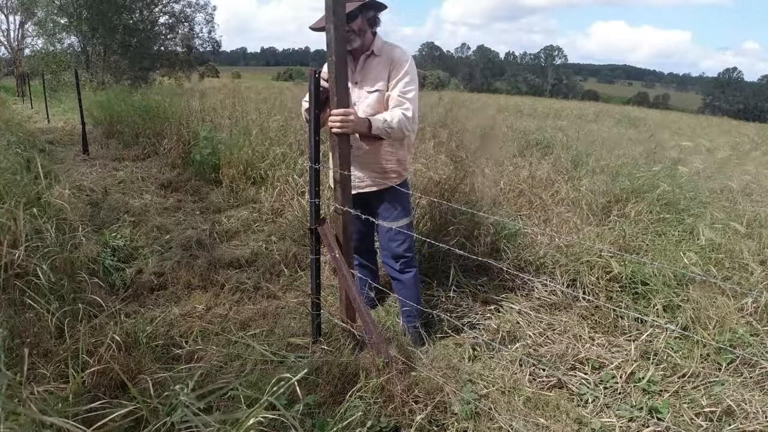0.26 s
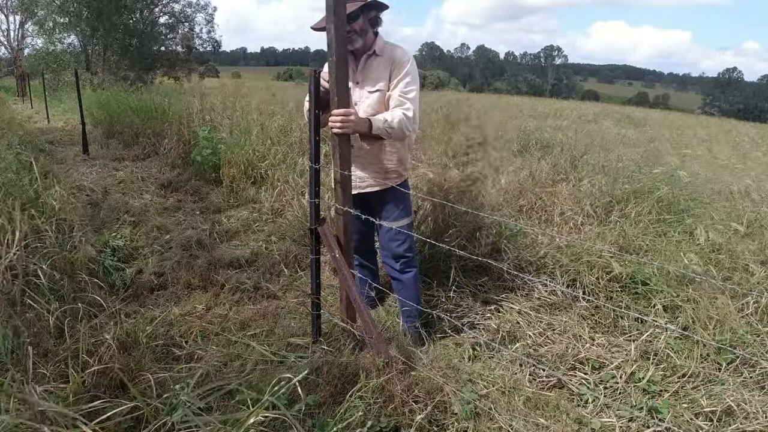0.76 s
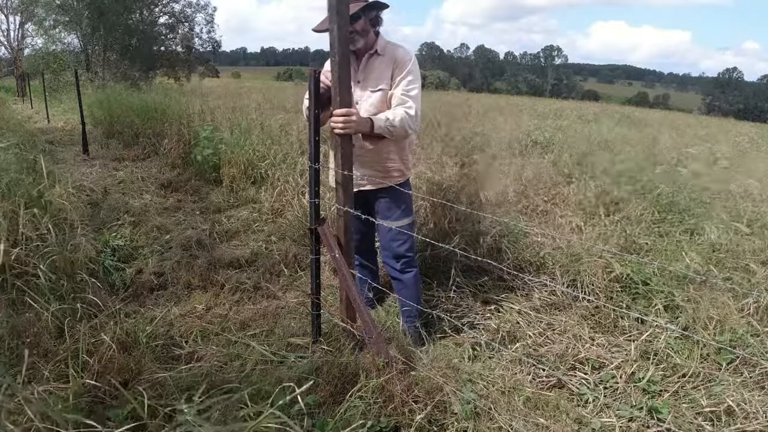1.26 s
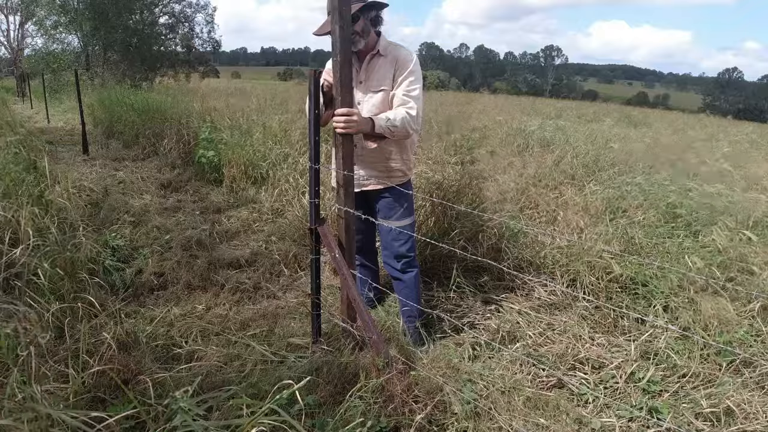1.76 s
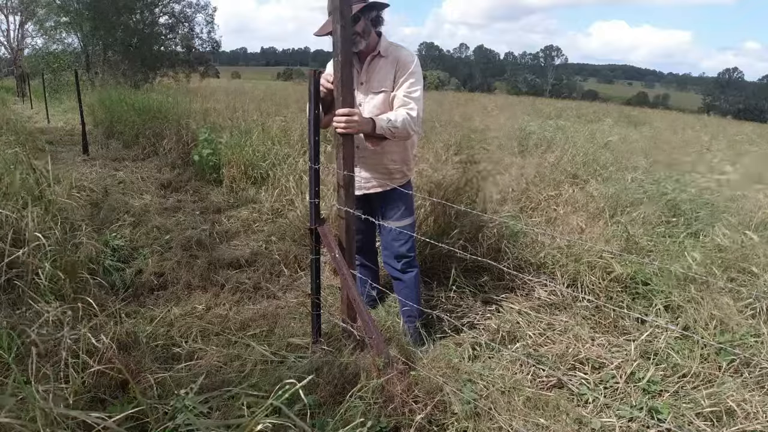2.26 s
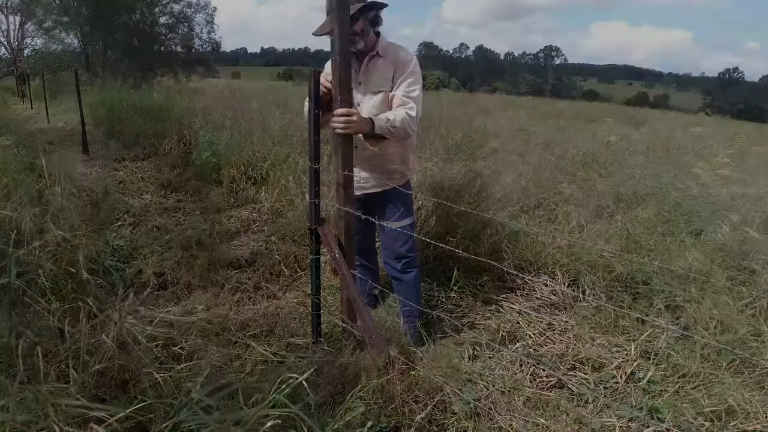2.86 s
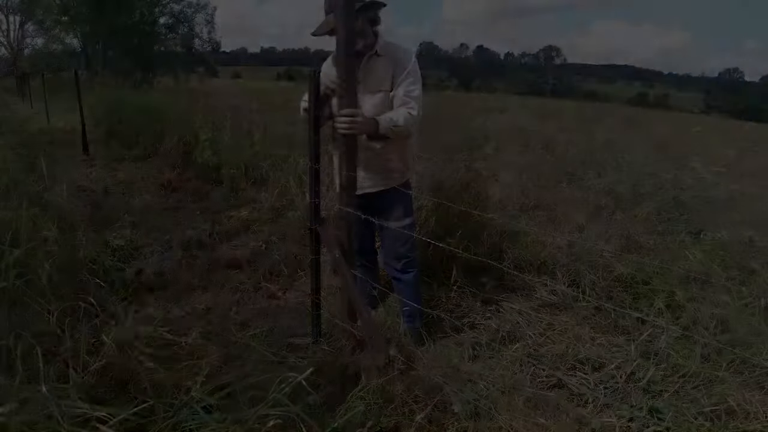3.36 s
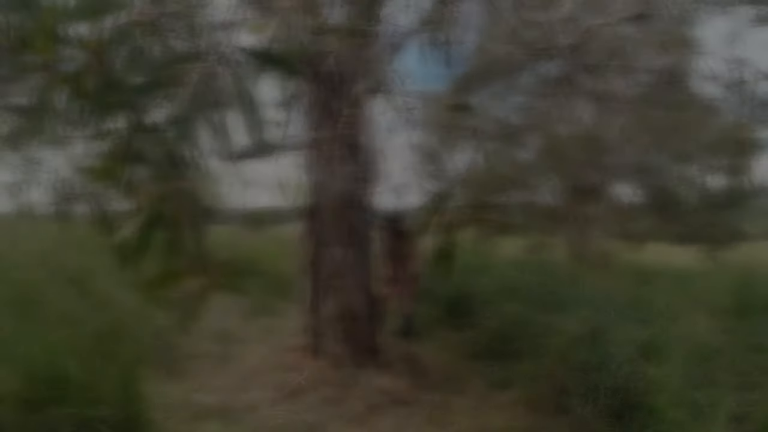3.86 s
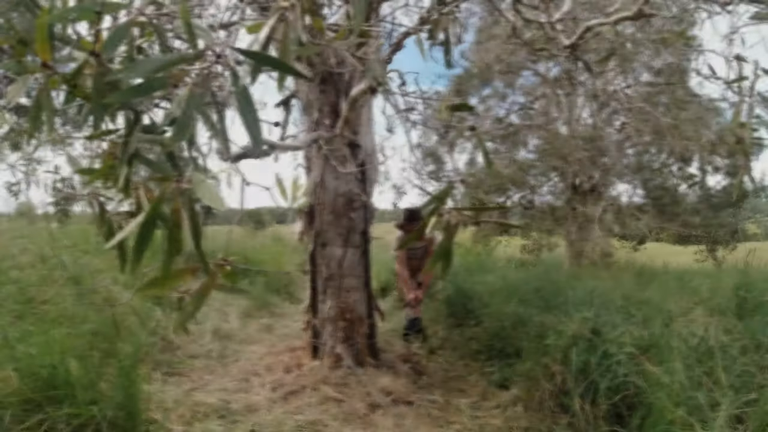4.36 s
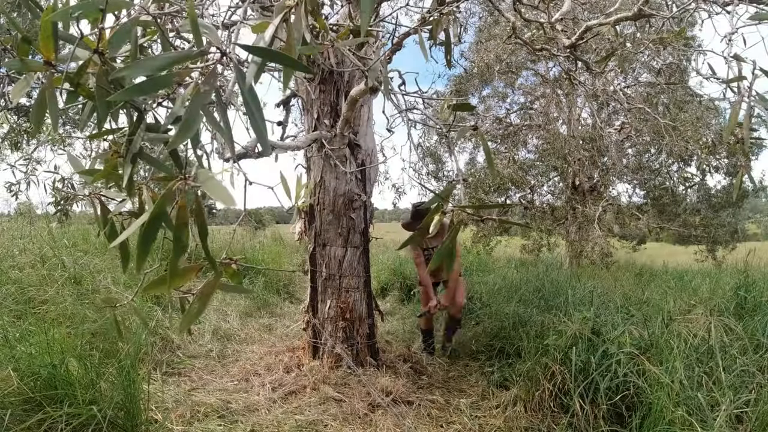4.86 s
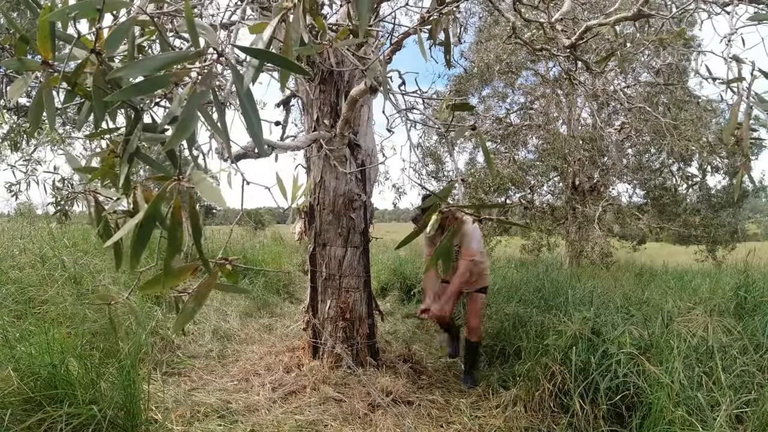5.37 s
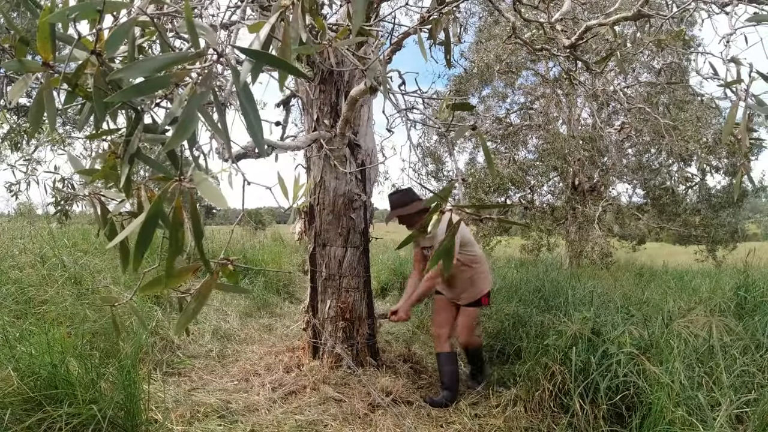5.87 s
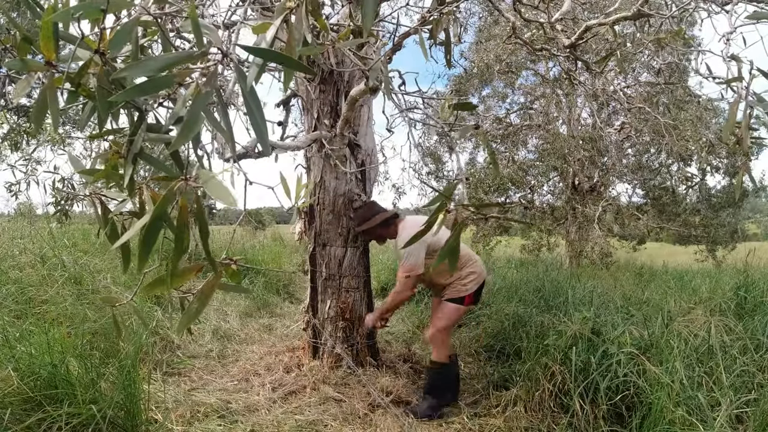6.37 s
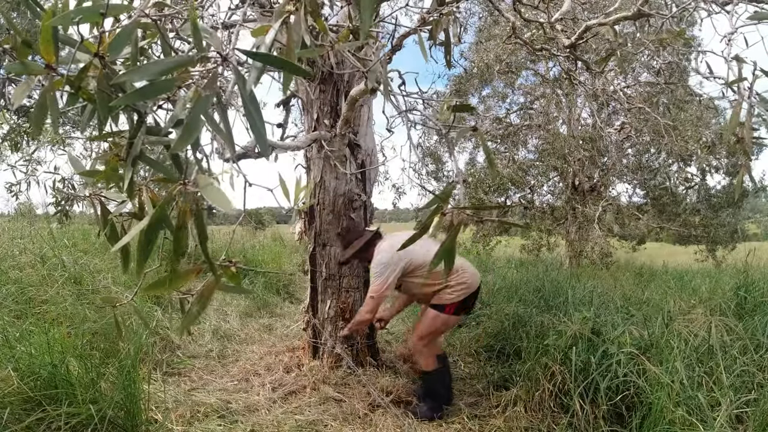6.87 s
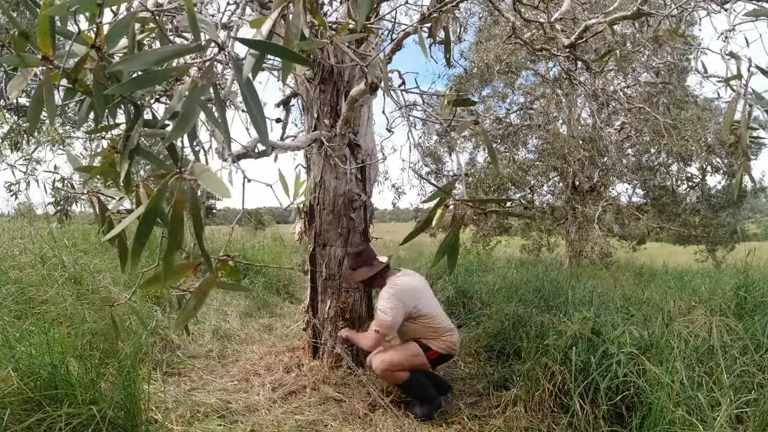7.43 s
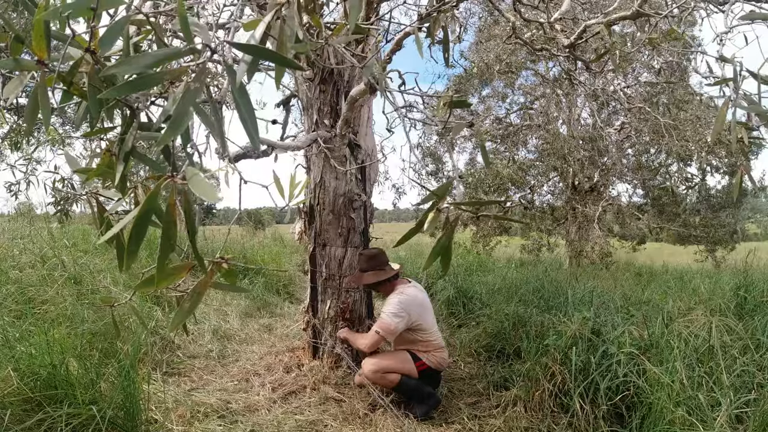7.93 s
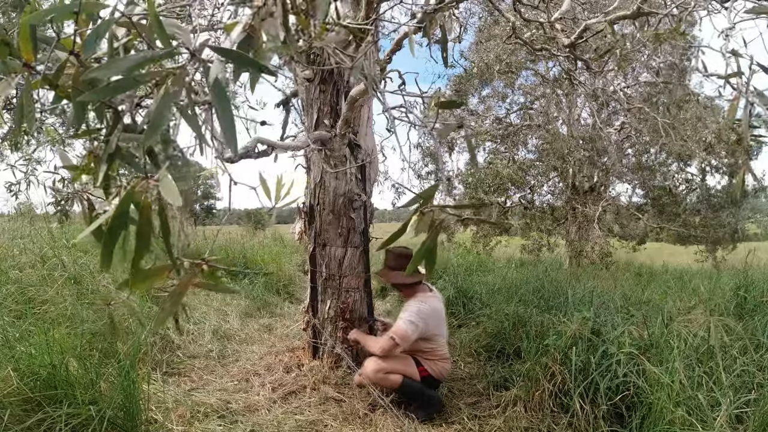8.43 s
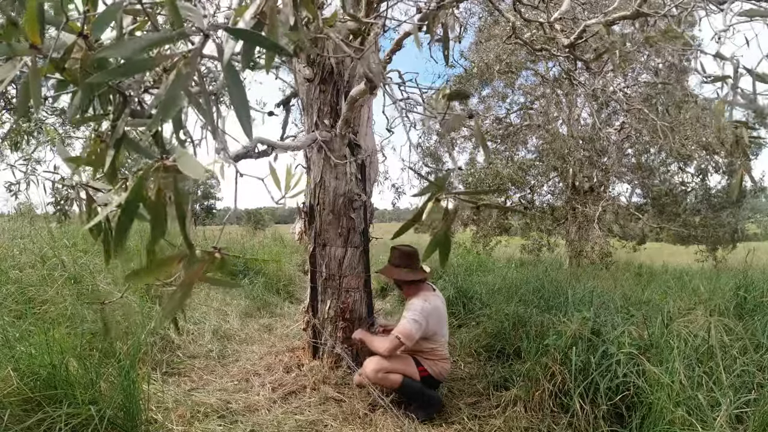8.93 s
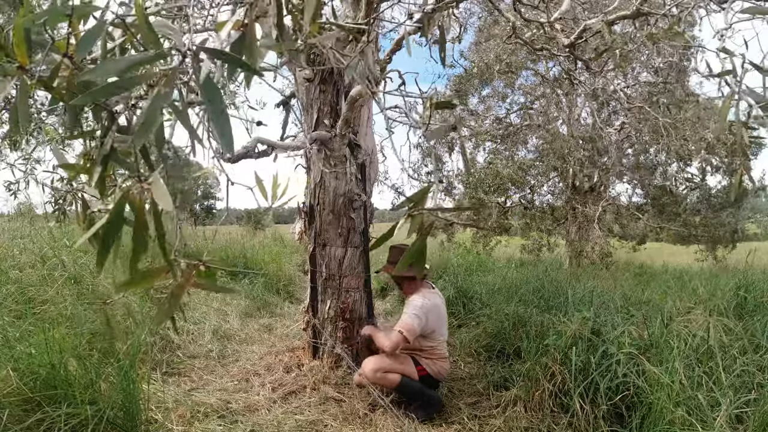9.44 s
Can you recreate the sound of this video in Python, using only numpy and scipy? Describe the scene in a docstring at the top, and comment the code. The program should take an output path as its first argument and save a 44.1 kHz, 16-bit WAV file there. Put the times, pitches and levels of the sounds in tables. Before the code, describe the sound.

From 0 s a short low gust bumps the microphone over a thin grassy breeze; from 0.9 to about 2.8 s heavier buffeting rumbles and distorts, with a faint tick near 2.1. It calms around 3 s, and faint chirps appear at 3.5. Near 4 s the air becomes a fuller hush under trees; boots swish through long grass, stalks snapping at 4.3-4.6, then a dense burst of cracks and thuds at 5.0-5.25. A distant engine drones about 4.2-6. Upward chirps recur; a stomp lands at 5.8, a faint steady whistling tone at 6-6.3, and a dull knock at 6.5. Rustling settles; a far bird trills evenly at 7.4-8.6, two clicks at 7.8. Wire jerks and rings at 8.35, rubs from 8.6, then from 9 to the end scrapes, rattles and squeaks rapidly with a thin high singing and soft wind rumble.

```python
"""Barbed wire is tugged, scraped and rattled round a trunk until it squeaks and rings: filtered friction noise,
decaying wire modes and short gliding tones; one long, faint, steady whistling tone is made like the squeaks.
Gusts first buffet the microphone as low-frequency noise; filtered noise also makes the breeze. Boots swish through
long grass (dense tiny fractures) and stomp, dry stalks snap and dull knocks land (short noise bursts).
Small birds call in gliding sines, and a far engine drones for a moment as a wavering sine."""
import sys
import numpy as np
from scipy import signal
from scipy.fft import rfft, irfft, next_fast_len
from scipy.io import wavfile
from scipy.ndimage import uniform_filter1d, map_coordinates

SR = 44100
rng = np.random.default_rng(int(sys.argv[2]) if len(sys.argv) > 2 else 0)


def store_wav(level_fs):
    """Save 16-bit WAV to argv[1]."""
    pcm = np.round(np.clip(np.atleast_2d(level_fs), -1, 1) * 32767)
    wavfile.write(sys.argv[1], SR, pcm.T.astype(np.int16))


N = 427769

TOP_HZ = 15750  # band limit of the microphone, and highest pitch of a grass fracture
# Spectrum of snaps, stomps and of wire rubbing on bark.
# Each row: frequency in Hz, relative spectral level in dB.
SNAP_SPECTRUM = [(100, -6.5), (500, 7), (1200, 7.5), (2200, 2.5), (3700, 3), (5300, -9), (8500, -9),
                 (12000, -21), (15500, -24)]


def amp(db):
    """Decibel law: 20 dB is a factor of ten in amplitude."""
    return 10 ** (np.asarray(db) / 20)


def unit(x):
    """Power normalisation: scale to rms 1."""
    return x / np.sqrt(np.mean(x ** 2) + 1e-20)


def along(points, hz):
    """Log-frequency interpolation: read (Hz, value) points at the frequencies hz."""
    f, v = np.transpose(points)
    return np.interp(np.log(hz + 1), np.log(f + 1), v)


def curves(rows):
    """Linear interpolation in time: one value per sample for each column after the time."""
    s, *columns = np.transpose(rows)
    return [np.interp(np.arange(N) / SR, s, column) for column in columns]


def during(rows, fade):
    """Linear gating: 1 while a curve lasts, fading to 0 outside it over fade seconds."""
    start, end = rows[0][0], rows[-1][0]
    return np.interp(np.arange(N) / SR, [start - fade, start, end, end + fade], [0, 1, 1, 0])


def wobble(rate):
    """Slow random modulation: a smooth curve through rate random knots a second."""
    knots = rng.standard_normal(int(N * rate / SR) + 4)
    return map_coordinates(knots, [np.arange(N) * rate / SR])


def stroke(s, rise, length, t60):
    """Envelope of one movement: a smooth rise, a hold until length, then an exponential decay."""
    t = np.arange(N) / SR - s
    onset = np.sin(np.pi / 2 * np.clip(t / rise, 0, 1)) ** 2
    return onset * np.exp(-np.log(1000) * np.clip((t - length) / t60, 0, 10))


def add(track, s, sound):
    """Superposition: mix a sound into the track at time s."""
    part = track[max(round(s * SR), 0):][:len(sound)]
    part += sound[:len(part)]


def noise(spectrum):
    """Spectral shaping: Gaussian noise of rms 1 with this spectrum."""
    m = next_fast_len(N + SR)
    white = rfft(rng.standard_normal(m))
    return unit(irfft(white * amp(along(spectrum, np.fft.rfftfreq(m, 1 / SR))), m)[:N])


def coloured(x, spectrum):
    """Minimum-phase filtering: a folded cepstrum gives a causal filter with this spectrum."""
    size = 8192
    cepstrum = irfft(np.log(amp(along(spectrum, np.fft.rfftfreq(size, 1 / SR)))))
    cepstrum[1:size // 2] *= 2
    cepstrum[size // 2 + 1:] = 0
    return signal.fftconvolve(x, irfft(np.exp(rfft(cepstrum))))[:len(x)]


def patchy(x, depth_db):
    """Time-varying spectrum: drifting patches of stronger and weaker sound, shallower in the bass, rms 1."""
    hz, _, z = signal.stft(x, SR, nperseg=1024)
    across_hz = uniform_filter1d(rng.standard_normal(z.shape), size=3, axis=0)
    field = unit(uniform_filter1d(across_hz, size=9, axis=1))
    depth = depth_db * (hz / (hz + 120))[:, None]
    return unit(signal.istft(z * amp(depth * np.clip(field, -2, 2)), nperseg=1024)[1][:N])


def crackle(spectrum, rate, spread_db, hiss):
    """Random fracture: many tiny damped ticks of varied size and pitch over a smooth rubbing hiss, rms 1."""
    t = np.arange(SR // 400) / SR
    when, pitch, size = rng.random((int(rate * N / SR), 3)).T[:, :, None]
    strength = amp(spread_db * np.minimum(-np.log(1 - size), 3))
    ticks = strength * np.sin(2 * np.pi * TOP_HZ * pitch * t) * np.exp(-t / .0007)
    at = (when * N).astype(int) + np.arange(len(t))
    grains = unit(np.bincount(at.ravel(), ticks.ravel(), N)[:N])
    return unit(coloured(grains + hiss * rng.standard_normal(N), spectrum))


def bounced(x, gain):
    """Early reflection: ground and trunk return a few copies within milliseconds."""
    out = x.copy()
    for delay in rng.uniform(.0008, .007, size=4):
        add(out, delay, gain * rng.choice([-1, 1]) * x)
    return out


def burst(spectrum, body_db, top_db, t60, attack, crack):
    """Impulsive friction: an optional first crack and a dying train of micro-slips, tilted in body and top."""
    t = np.arange(SR // 4) / SR
    slips = amp(3.5 * unit(uniform_filter1d(rng.standard_normal(len(t)), size=50)))
    force = rng.standard_normal(len(t)) * slips * amp(-60 * t / t60) * (1 - np.exp(-t / attack))
    force[0] += crack
    tilt = [(1200, body_db), (2400, 0.02), (4200, 0.0047), (8000, top_db), (14000, 2 * top_db - 2.5)]
    x = bounced(coloured(force, [(hz, db + along(tilt, hz)) for hz, db in spectrum]), gain=0.26)
    # bring the loudest short-time rms to 1/e
    return x / np.sqrt(np.max(uniform_filter1d(x * x, size=256))) / np.e


def grove(x):
    """Multiple scattering: trunks and foliage return a decaying tail, 10 ms late."""
    # Echo decay. Each row: frequency in Hz, t60 in seconds.
    decay = [(200, 1), (2000, 0.23), (6000, 0.35), (12000, 0.16)]
    hz, t, z = signal.stft(rng.standard_normal(SR // 2), SR, nperseg=256)
    tail = signal.istft(z * amp(-60 * t / along(decay, hz)[:, None]), SR, nperseg=256)[1]
    return signal.fftconvolve(x, np.pad(tail, (SR // 100, 0)) / np.linalg.norm(tail))[:N]


def narrow(hz, width):
    """Randomly driven resonance: a narrow band kept ringing by friction, rms 1; hz holds one pitch per sample."""
    size = len(hz)
    knots = rng.standard_normal((2, int(size * width / SR) + 4))
    a, b = [map_coordinates(k, [np.arange(size) * width / SR]) for k in knots]
    phase = 2 * np.pi * np.cumsum(hz) / SR
    return unit(a * np.cos(phase) + b * np.sin(phase))


def wind():
    """Turbulent pressure: each gust swings the diaphragm slowly and breaks into faster turbulence."""
    # Gusts that catch the microphone.
    # Each row: start in seconds, length before the decay in seconds, slow swing in dB, turbulence in dB.
    gusts = [(-.03, 0.18, -25.5, -38), (0.217, 0.47, -40.5, -48.5), (0.879, 0.35, -16, -44.5),
             (1.16, 0.35, -9, -31), (1.552, 0.31, -11.5, -36.5), (1.964, 0.14, -12, -35),
             (2.12, 0.27, -18.5, -35.5), (2.48, 0.2, -42.5, -42.5), (3.157, 0.22, -30, -59),
             (3.728, 0.036, -25, -52), (3.966, 0.083, -19.5, -35.5), (4.122, 0.25, -22, -60),
             (8.989, 0.13, -23, -49), (9.302, 0.46, -19, -43)]
    # Single pushes of air. Each row: start in seconds, relative level in dB, period in seconds.
    puffs = [(1.185, -6, 0.037), (1.378, -7, 0.025), (1.447, -9, 0.019), (1.743, -16, 0.0092),
             (5.429, -13, .16), (5.981, -17.5, 0.055), (6.489, -14, 0.13), (8.348, -12, 0.066)]
    # Spectra of the two motions. Each row: frequency in Hz, relative spectral level in dB.
    swing_spectrum = [(3, -2), (8, 1), (16, -7), (30, -11), (50, -23.5), (100, -38.5), (300, -61),
                      (1000, -120)]
    turbulence_spectrum = [(15, -18.5), (35, -14), (65, 0.5), (100, -11), (150, -18.5), (330, -32.5),
                           (600, -50.5), (2000, -82)]
    rise_s, t60_s, calm_db = 0.031, 0.44, -60.5  # calm: the slow swing between gusts
    swing, turbulence = amp(calm_db), 0
    for s, length, swing_db, turbulence_db in gusts:
        gust = stroke(s, rise_s, length, t60_s)
        swing = np.maximum(swing, amp(swing_db) * gust)
        turbulence = np.maximum(turbulence, amp(turbulence_db) * gust)
    out = swing * noise(swing_spectrum)
    t = np.arange(SR // 2) / SR
    for s, db, period in puffs:
        # the diaphragm is pushed one way and swings back
        push = np.sin(2 * np.pi * t / period) * np.exp(-(t / period) ** 2)
        add(out, s, amp(db - 1.0) * push * (1 - np.exp(-t / 0.0022)))
    eddies = unit(amp(3.5 * wobble(24)))
    return out + turbulence * eddies * noise(turbulence_spectrum)


def breeze():
    """Broadband flow noise: the hush of open grass gives way to the fuller air under the trees."""
    # Breeze in the open grass, then air under the trees. Each row: time in seconds, relative level in dB.
    paddock_levels = [(0, -51), (1.05, -52), (1.2, -55), (3.1, -58), (3.9, -61)]
    tree_levels = [(2.6, -86), (3.2, -65.5), (4.2, -50.5), (7.0, -51.5), (9.7, -51.5)]
    # Spectra of the two airs. Each row: frequency in Hz, relative spectral level in dB.
    open_spectrum = [(20, -8.5), (100, 11), (250, 1), (630, -3.5), (1200, -8), (2500, -13.5), (3700, -17),
                     (4600, -16), (6000, -22.5), (8500, -24), (11000, -30), (15500, -43.5)]
    tree_spectrum = [(20, -5.5), (75, 3), (130, -2), (220, -9), (420, -8.5), (800, -16), (1500, -21),
                     (2500, -23.5), (4400, -28.5), (5300, -32.5), (7000, -37.5), (8100, -33.5),
                     (10400, -45.5), (15500, -52.5)]
    open_air = patchy(noise(open_spectrum), depth_db=1.7)
    tree_air = patchy(noise(tree_spectrum), depth_db=2.6)
    open_gain = amp(curves(paddock_levels)[0] + wobble(6.9)) * during(paddock_levels, 0.32)
    tree_gain = amp(curves(tree_levels)[0] + 4.0 + 0.64 * wobble(4.6))
    return open_gain * open_air + tree_gain * tree_air


def grass():
    """Granular friction: stalks brush along boots and wire, then settle; each sweep adds a crisp top."""
    # Sweeps of legs and wire through grass.
    # Each row: start in seconds, rise in seconds, length before the decay in seconds, body level in dB,
    # crisp top level in dB, upper edge of that top in Hz.
    swishes = [(0.863, 0.056, 0.26, -59.5, -71.5, 15100), (4.038, 0.034, .3, -54, -75, 8450),
               (4.236, 0.14, 0.21, -45, -46.5, 16000), (4.462, 0.045, 0.18, -46, -54, 14100),
               (4.97, 0.19, .21, -36, -43, 16100), (5.797, 0.018, 0.024, -40.5, -49.5, 11700),
               (5.943, 0.095, 0.13, -47.5, -56.5, 10600), (6.454, 0.043, 0.033, -44.5, -60, 12200)]
    # Spectra of body and crisp top. Each row: frequency in Hz, relative spectral level in dB.
    body_spectrum = [(100, -1), (350, 2), (700, -2), (1300, -1), (2200, 0.5), (3000, -2), (4300, -2),
                     (5300, -16.5), (7000, -9), (9500, -22.5), (12000, -53)]
    crisp_spectrum = [(2400, -26), (4200, 11.5), (5500, -10), (8500, 5.5), (12000, -1), (15500, -9)]
    # the sweep dies sooner; bent stalks keep springing back
    sweep_t60_s, settle_db, settle_t60_s = 0.81, -7, 1.52
    stalks = patchy(crackle(body_spectrum, rate=2800, spread_db=4.2, hiss=.7), depth_db=2.3)
    blades = patchy(crackle(crisp_spectrum, rate=4500, spread_db=3, hiss=.95), depth_db=2.8)
    body, crisp = 0, 0
    for s, rise, length, db, crisp_db, edge_hz in swishes:
        settling = amp(settle_db) * stroke(s, rise, length, settle_t60_s)
        sweep = np.maximum(stroke(s, rise, length, sweep_t60_s), settling)
        body = np.maximum(body, amp(db) * sweep)
        edge = signal.butter(6, min(edge_hz, .45 * SR), fs=SR, output="sos")
        crisp = crisp + amp(crisp_db) * sweep ** 1.2 * signal.sosfilt(edge, blades)
    clumps = unit(amp(wobble(35)))
    return clumps * (body * stalks + crisp)


def sliding():
    """Sliding friction: each pull rubs wire on bark; tightening, it sings in two modes, the upper creeping sharp."""
    # Pulls of the wire over post and bark.
    # Each row: start in seconds, length before the decay in seconds, level in dB.
    pulls = [(2.042, 0.04, -56), (8.616, 0.07, -55), (8.756, 0.037, -50.5), (8.945, 0.093, -53),
             (9.134, 0.65, -53.5)]
    rise_s, t60_s = 0.047, 0.16
    sing_from_s, sing_rise_s, sing_db = 8.91, .75, -65
    low_hz, high_hz, stretch_hz = 6045, 7920, 310
    pull = sum(amp(db) * stroke(s, rise_s, length, t60_s) for s, length, db in pulls)
    rub = pull * patchy(crackle(SNAP_SPECTRUM, rate=1600, spread_db=4.2, hiss=.65), depth_db=4.5)
    tension = np.clip((np.arange(N) / SR - sing_from_s) / sing_rise_s, 0, 1)
    low = amp(-6 + 4 * wobble(16)) * tension * narrow(np.full(N, low_hz), width=60)
    high = amp(3.7 * wobble(15)) * tension * narrow(high_hz + stretch_hz * tension, width=120)
    return rub + amp(sing_db) * (low + high)


def snaps():
    """Impulse and resonance: stalks break, barbs flick off bark and a boot stomps, each with a short ring."""
    # Stalks and barbs snapping; the pair at 5.82 s is a boot stomp. Each row: start in seconds,
    # relative level in dB, body tilt in dB, top tilt in dB, pitch of the ring in Hz.
    impacts = [(2.075, -52, -3, -11, 1660), (3.887, -34.5, 4, -5, 885), (4.331, -28, -1, -17, 1610),
               (4.355, -25.5, -3.5, -2, 940), (4.516, -27.5, -10, 6.5, 3800), (4.638, -32, -14, -7, 3380),
               (5.073, -27, -4, 11, 3000), (5.116, -24, 14, -8, 1500), (5.138, -21, -10, -0.5, 4160),
               (5.222, -13.5, 4.5, 7, 4400), (5.242, -32, 4, -10, 1490), (5.499, -25, 1.5, -14, 1270),
               (5.579, -37, -8, -17, 1883), (5.656, -41.5, -7, -8, 1700), (5.818, -19, 9, -9, 870),
               (5.822, -17, 2.5, -12, 1400), (6.038, -31, -9, -10, 2820), (6.162, -36, -5, -9, 2200),
               (6.522, -19.5, 8, 1, 1700), (7.806, -22.5, 7, -1, 2800), (7.851, -23, 2.5, -2, 2570)]
    ring_db, ring_q = 6, 2.47
    out = np.zeros(N)
    for s, db, body_db, top_db, hz in impacts:
        snap = burst(SNAP_SPECTRUM, body_db, top_db, t60=.016, attack=.0005, crack=14)
        ring = signal.lfilter(*signal.iirpeak(hz, ring_q, SR), snap)
        add(out, s, amp(db - 4.0) * (snap + amp(ring_db) * ring))
    return out


def whistle(hz, length, glide, bend):
    """Frequency modulation: one bird note, a quavering sine gliding by a share of its pitch."""
    u = np.linspace(0, 1, int(length * SR))
    quaver = .012 * unit(uniform_filter1d(rng.standard_normal(len(u)), size=60))
    pitch = hz * (1 + quaver + glide * (u + bend * u ** 5))
    return np.sin(np.pi * u) * np.sin(2 * np.pi * np.cumsum(pitch) / SR)


def birds():
    """Gliding tones and scattering: a near bird flicks its notes upward; farther ones pipe short falling notes."""
    # Rising chirps of a small bird.
    # Each row: start in seconds, start pitch in Hz, relative level in dB, relative echo level in dB.
    chirps = [(3.462, 5230, -50.5, 2), (3.675, 5110, -45.5, 2.5), (4.886, 5210, -42, 1),
              (5.077, 5200, -41.5, -10), (5.569, 5080, -50.5, -8), (6.463, 5300, -45, -2)]
    # Short notes of farther birds. Each row: start in seconds, start pitch in Hz, relative level in dB.
    far_notes = [(2.865, 5660, -70), (3.3, 4570, -68), (3.405, 5470, -65), (3.575, 5770, -57.5),
                 (6.94, 5450, -63), (7.03, 6550, -60), (7.06, 6000, -57.5), (7.069, 4650, -60),
                 (7.11, 6270, -60)]
    # a far bird's even run of piping notes, swelling and fading
    trill_from_s, trill_to_s, trill_gap_s = 7.418, 8.62, .106
    trill_peak_s, trill_db, trill_fade_db_per_s = 8.1, -49.5, 15
    near, scattered, far = np.zeros((3, N))
    for s, hz, db, echo_db in chirps:
        note = whistle(hz, length=.04, glide=.045, bend=2.2)
        add(near, s, amp(db + 0.5) * note)
        add(scattered, s, amp(db - 7.0 + echo_db) * note)
    for s, hz, db in far_notes:
        add(far, s, amp(db) * whistle(hz, length=0.0393, glide=-0.058, bend=0.32))
    echo = grove(far + scattered)
    out = .5 * far + near + echo + .5 * grove(echo)
    for s in np.arange(trill_from_s, trill_to_s, trill_gap_s):
        db = trill_db - trill_fade_db_per_s * abs(s - trill_peak_s)
        add(out, s, amp(db) * whistle(2360 + rng.normal(0, 12), length=.036, glide=-.075, bend=.1))
    return out


def engine():
    """A single harmonic component: only the firing note of a far engine carries this far."""
    # Drone of the engine. Each row: time in seconds, pitch in Hz, relative level in dB.
    drone = [(3.8, 120.7, -80), (4.3, 129.3, -49.5), (4.7, 140, -49.5), (5.2, 142, -53),
             (5.9, 136.7, -54.5), (6.6, 134.5, -73)]
    hz, db = curves(drone)
    gain = amp(db + 3.5 + 4.4 * wobble(9.3)) * during(drone, 0.18)
    return gain * np.sin(2 * np.pi * np.cumsum(hz * (1 + 0.0051 * wobble(16))) / SR)


def thuds():
    """Damped oscillation: soft blows on earth, a few low cycles under a dull crush."""
    # Boots and dull knocks on the ground.
    # Each row: start in seconds, relative level in dB, pitch in Hz, t60 in seconds.
    blows = [(4.703, -31, 226, 0.027), (5.049, -28, 410, 0.041), (5.076, -29.5, 380, 0.051),
             (5.116, -26, 320, 0.041), (5.82, -24.5, 248, 0.078), (6.003, -20.5, 181, 0.032),
             (6.556, -16, 354, 0.03)]
    crush_spectrum = [(40, 21), (400, 5), (1000, -5), (2500, -31), (8000, -58)]  # Hz, relative dB
    out, t = np.zeros(N), np.arange(SR // 4) / SR
    for s, db, hz, t60 in blows:
        earth = np.sin(2 * np.pi * hz * t) * amp(-60 * t / t60) * (1 - np.exp(-t / 0.00011))
        crush = burst(crush_spectrum, 0, 0, t60, attack=0.0012, crack=29)
        add(out, s, amp(db) * (earth + 0.68 * crush))
    return out


def squeaks():
    """Frequency and amplitude modulation: unsteady tones, most of them short wire squeaks, with faint high modes."""
    # Short wire squeaks; the row at 5.96 s is a long, faint, steady whistling tone. Each row: start in seconds,
    # length in seconds, start pitch in Hz, end pitch in Hz, level in dB, pitch roughness as a share.
    tones = [(5.96, 0.31, 1141, 1127, -57.5, .003), (9.077, 0.024, 2500, 3650, -50, .02),
             (9.165, .045, 2760, 2990, -51, 0.015), (9.182, .05, 3500, 3720, -48, .009),
             (9.231, 0.028, 4680, 4520, -48, 0.017), (9.259, .033, 4460, 4340, -46, 0.016),
             (9.296, 0.031, 2700, 2940, -42, .015), (9.306, .018, 4620, 4670, -46, .012),
             (9.591, .027, 3080, 3450, -50, .012)]
    # High modes that sound with every tone. Each row: frequency in Hz, level relative to the tone in dB.
    high_modes = [(6045, -14), (11000, -28)]
    mode_width_hz = 57
    out = np.zeros(N)
    for s, length, start_hz, end_hz, db, rough in tones:
        u = np.linspace(0, 1, int(length * SR))
        pitch_jitter, level_jitter = unit(uniform_filter1d(rng.standard_normal((2, len(u))), size=40))
        pitch = (start_hz + (end_hz - start_hz) * u) * (1 + rough * pitch_jitter)
        tone = amp(db) * (1 + 0.34 * level_jitter) * np.sin(2 * np.pi * np.cumsum(pitch) / SR)
        mode = sum(amp(db + mode_db) * narrow(np.full(len(u), hz), mode_width_hz) for hz, mode_db in high_modes)
        add(out, s, np.sqrt(np.abs(np.sin(np.pi * u))) * (tone + mode))
    return out


def woody(x):
    """Resonance: the trunk's modes add to whatever scrapes it and shift from spot to spot."""
    # Wood under the wire. Each row: centre frequency in Hz before the shift, width in Hz before the shift,
    # gain in dB.
    trunk = [(597, 87, 4.5), (894, 70, -6), (1330, 90, 5.5)]
    shift = np.exp(rng.normal(0, .05, len(trunk)))
    out = x
    for (hz, width, db), k in zip(trunk, shift):
        out = out + amp(db) * signal.lfilter(*signal.iirpeak(hz * k, hz / width, SR), x)
    return out


def jerks():
    """Modal excitation: each tug or rebound rakes barbs over the trunk and rings the wire at new strengths."""
    # Jerks and rebounds of the wire. Each row: start in seconds, relative level in dB, body tilt in dB,
    # relative top tilt in dB, scrape t60 in seconds, relative ring level in dB, pitch of the contact in Hz.
    tugs = [(8.334, -20, 1.5, 8, 0.068, -10, 2150), (8.357, -37, 1, -2, .03, -4.5, 3400),
            (8.385, -28, -2.5, 6, 0.045, -15, 8400), (9.041, -31.5, -4.5, -7, 0.099, -31, 2060),
            (9.320, -19, -0.5, 7, 0.02, -27, 1400), (9.361, -32, -4, 0, 0.066, -22, 1500),
            (9.420, -21.5, -4, -4, 0.017, -22, 2870), (9.476, -27.5, 0, -14, 0.021, -15, 1400),
            (9.509, -20.5, -4, 0.5, 0.027, -24, 1430), (9.522, -23.5, -2.5, 3.5, 0.034, -23, 2750),
            (9.538, -27, -2, 0, 0.023, -30, 2880), (9.662, -24.5, -6, -15, 0.03, -10, 3230),
            (9.677, -27.5, 1, -15, 0.055, -15, 2210)]
    # Modes of the strained wire. Each row: frequency in Hz, mean relative level in dB, t60 in seconds.
    wire_modes = [(1335, -2, .18), (1780, 0, .17), (2160, -4, .12), (2875, -9, .2), (3365, -2, .32),
                  (5200, -13, .45), (6060, -20, .2), (6988, -5, .08), (7946, -10, .16), (8296, -8, .18)]
    # Spectrum of the scrape. Each row: frequency in Hz, relative spectral level in dB.
    scrape_spectrum = [(100, 6.5), (600, 6), (1000, 5.5), (1400, 1), (2000, 4.5), (3000, 0.5), (4400, -6),
                       (5500, -19), (6500, -16), (8500, -18.5), (12000, -29.5), (15500, -39)]
    contact_db, contact_q = 3, 7.7  # each contact rings briefly at its own pitch
    out, t = np.zeros(N), np.arange(SR // 2) / SR
    hz, level_db, life = np.transpose(wire_modes)[:, :, None]
    for s, db, body_db, top_db, t60, ring_db, contact_hz in tugs:
        # the loose wire keeps chattering, which scatters the phase of its modes
        chatter = np.cumsum(rng.normal(0, .032, (len(hz), len(t))), axis=1)
        strength = amp(level_db + rng.normal(0, 1.8, hz.shape) - 60 * t / life)
        modes = strength * np.sin(2 * np.pi * hz * t + chatter)
        add(out, s, amp(db + ring_db - 8.0) * modes.sum(axis=0) * (1 - np.exp(-t / 0.00076)))
        scrape = burst(scrape_spectrum, body_db, top_db + 2.5, t60, attack=t60 / 20, crack=0)
        contact = signal.lfilter(*signal.iirpeak(contact_hz, contact_q, SR), scrape)
        add(out, s, amp(db - 2.5) * (woody(scrape) + amp(contact_db) * contact))
    return out


def scene():
    """Superposition: work close by with a faint echo, birds deeper among the trees, wind over everything."""
    work = snaps() + jerks() + sliding() + squeaks()
    echo = amp(-10.0) * grove(work)
    return (work + echo + thuds() + birds() + grass() + engine() + breeze() + wind())[None]


def record(dry):
    """Soft saturation and band limiting: strong gusts overload the microphone; nothing above TOP_HZ passes."""
    saturated = dry / (1 + np.abs(dry / .9) ** 6) ** (1 / 6)
    held = saturated * signal.windows.tukey(N, .001)  # very short fades at both ends
    m = next_fast_len(N + SR // 2)
    return irfft(rfft(held, m) * (np.fft.rfftfreq(m, 1 / SR) < TOP_HZ), m)[..., :N]


dry = scene()
out = record(dry)
store_wav(out)
```